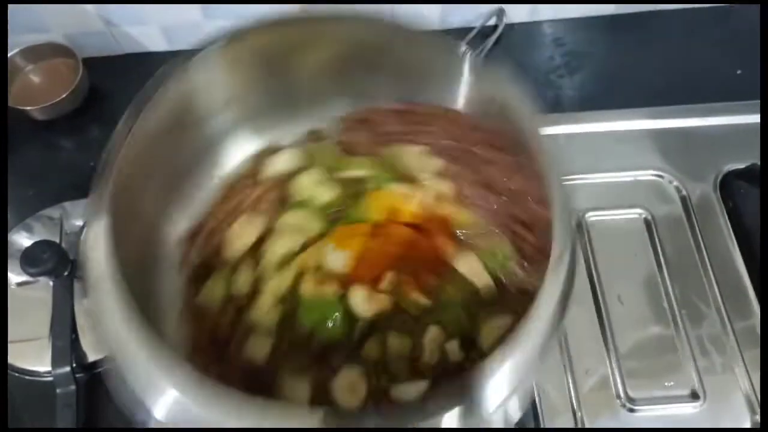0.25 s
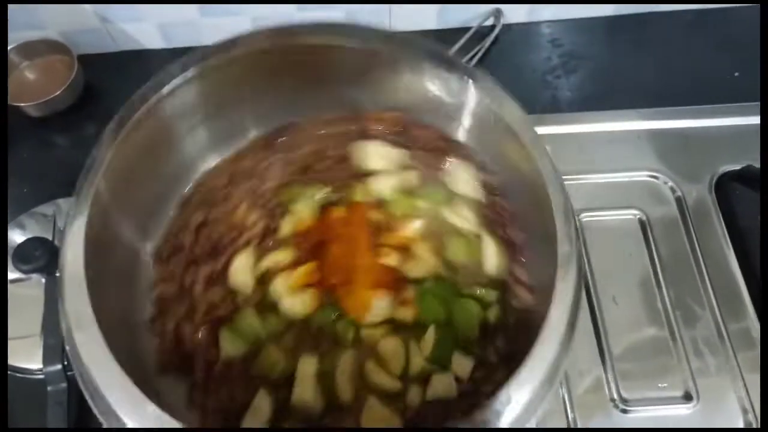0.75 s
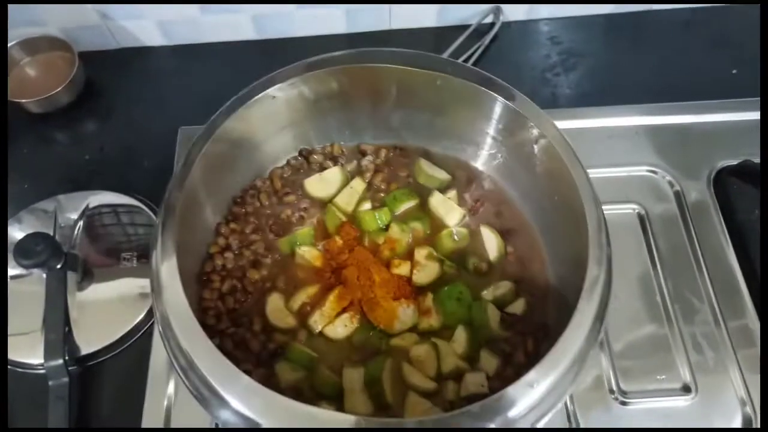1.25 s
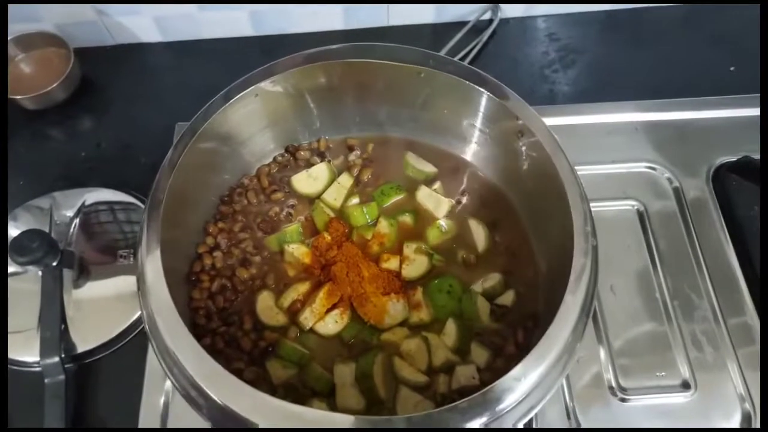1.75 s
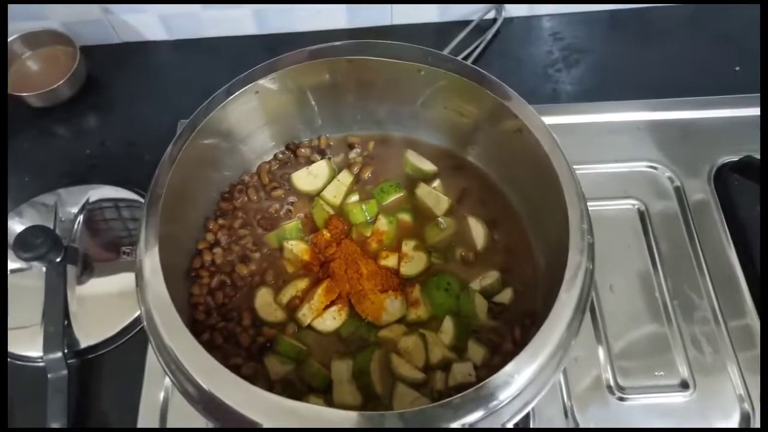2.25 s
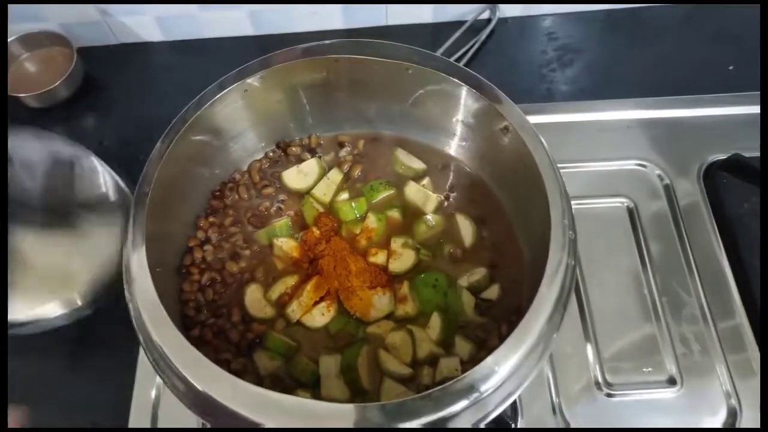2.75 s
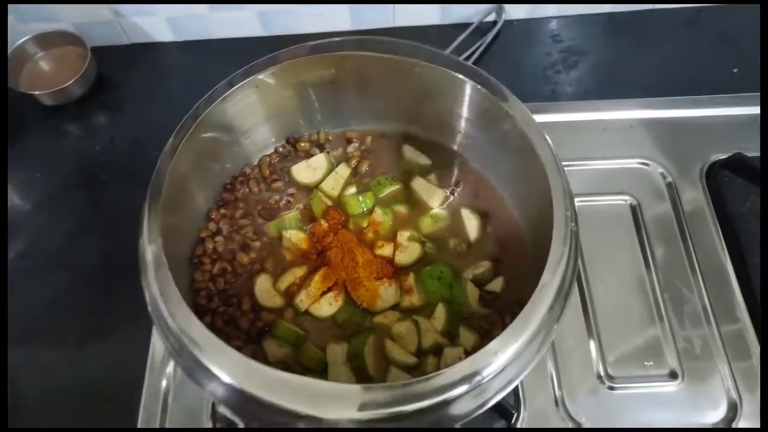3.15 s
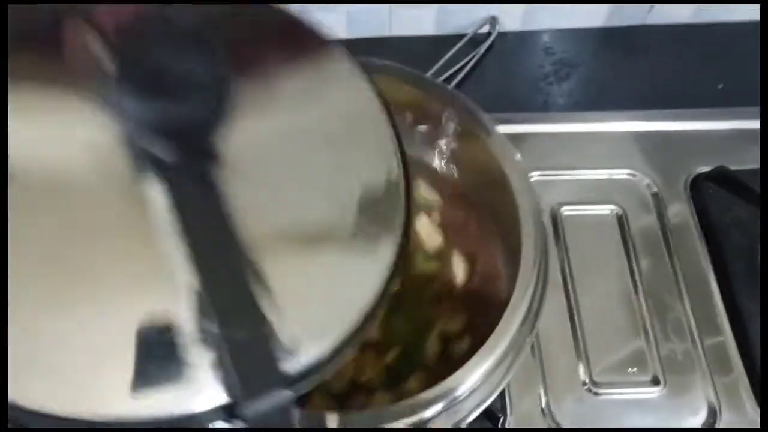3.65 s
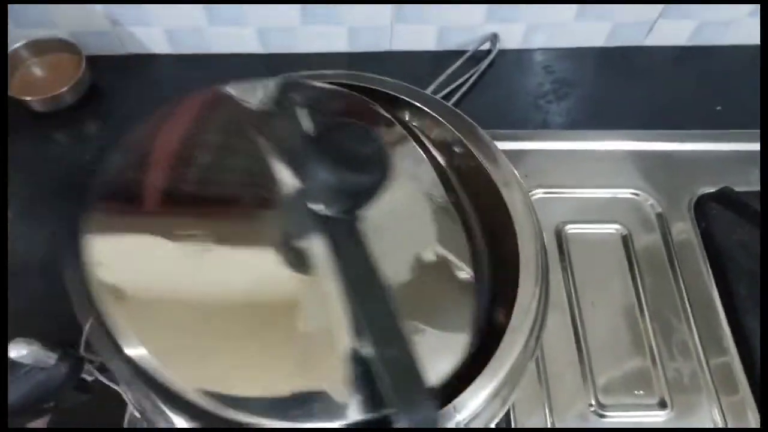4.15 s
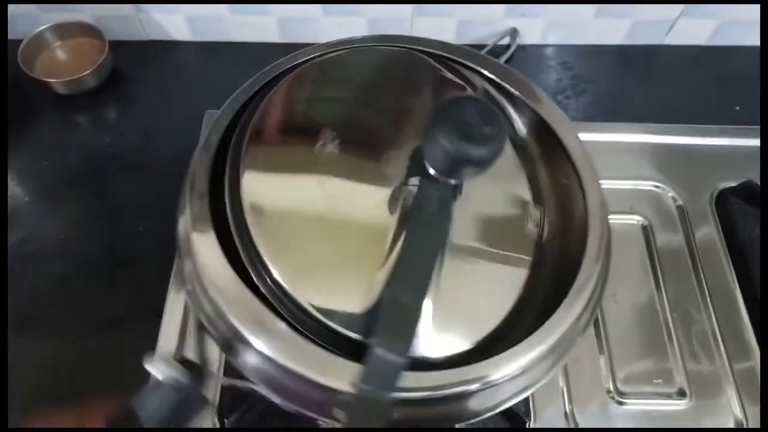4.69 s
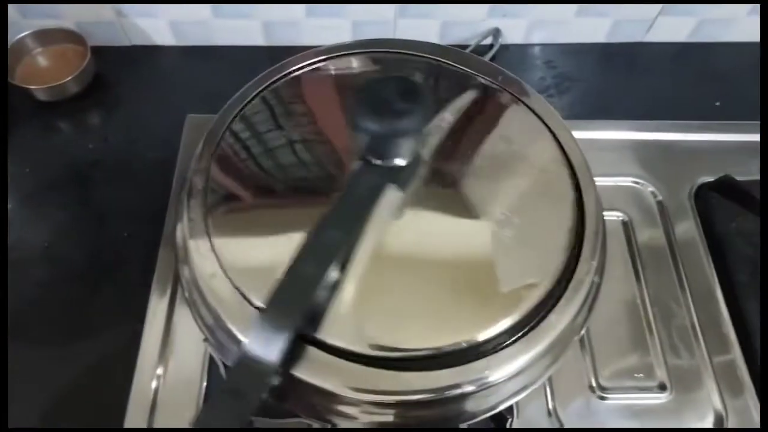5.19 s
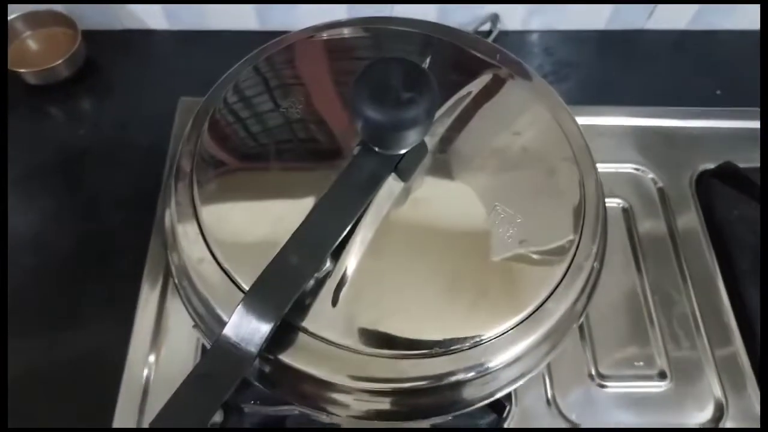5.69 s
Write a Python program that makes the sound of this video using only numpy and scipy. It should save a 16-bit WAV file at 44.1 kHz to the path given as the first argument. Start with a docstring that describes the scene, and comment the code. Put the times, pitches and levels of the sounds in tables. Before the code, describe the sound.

Close stereo microphone over a steel pressure cooker, short bright room ring. Faint sloshing beans and tiny metallic ticks come first, then a cluster of heavy pot-on-stove knocks. Near quiet follows, broken by a brief lid scrape and light rattles. Deeper knocks, a rim slide, a high pulsing squeak and bright lid clatter lead to a final hollow clank.

```python
"""Wet beans hiss in a carried steel pot, the pot knocks down on a gas stove, and its lid scrapes, bangs and squeaks.
The lid is dragged off the counter, knocked and slid into the mouth of the pot, and pulled shut.
Blows and rubbing excite noise and sine modes that die away, with a small tiled kitchen in the dense ring.
Swelling sines make the squeak, dying sines the knocks and booms, wandering tones the hums.
A pair of microphone ports close above the pot hears it in stereo, over faint kitchen air."""
import sys
import numpy as np
from scipy import signal
from scipy.fft import rfft, irfft
from scipy.io import wavfile
from scipy.ndimage import uniform_filter1d

SR = 44100
rng = np.random.default_rng(int(sys.argv[2]) if len(sys.argv) > 2 else 0)


def put_to_file(sound):
    """Save the sound as 16-bit audio at rate SR, in the file named by the first command-line argument."""
    columns = np.atleast_2d(sound).T  # one column per channel
    safe = np.clip(columns, -1, 1)
    whole_steps = np.round(safe * 32767)
    wavfile.write(sys.argv[1], SR, whole_steps.astype(np.int16))


N = 261326  # length of the scene [samples]

# Pot meeting the stove top: (time [s], middle-band level [dB], bass relative to it [dB], chatter [s])
STOVE_CONTACTS = [(1.293, -31, -2.5, 0.11), (1.419, -26, -4, 0.045), (1.489, -29.5, -3.5, 0.039),
                  (1.541, -26.5, -5, 0.04), (1.763, -54.5, 15, 0.026), (1.871, -31, -4.5, 0.083),
                  (1.932, -49.5, 4.5, 0.44), (3.493, -35.5, -6.5, 0.22), (3.557, -34.5, -11, 0.013),
                  (3.68, -28.5, -7, 0.027)]
# Colour of the beans and of the tick cracks: (frequency [Hz], relative level [dB])
BEAN_COLOUR = [(290, -28), (500, -19.5), (1170, -17), (1580, -24), (1770, -17), (2130, -19.5),
               (2800, -12.5), (4910, -8), (15500, -27.5)]
# How alike the two ports are: (frequency [Hz], likeness [0 to 1])
PORT_LIKENESS = [(60, 0.68), (250, 1), (500, 1), (1000, 0.5), (2400, 0.058), (6000, 0.0057),
                 (15000, 0.0098)]
# Many close modes of the lid on the pot, with the room: (frequency [Hz], relative level [dB])
LID_COLOUR = [(18, -58), (60, -18), (200, -2), (380, 0.5), (830, -1), (1200, 0.5), (2200, -4), (4500, -5),
              (8200, -16), (11000, -17.5), (15500, -23.5)]
# Lid held off the pot, with its bar: (frequency [Hz], width [Hz], level over dense ring before variation [dB])
BAR_MODES = [(1135, 69, 5), (1482, 105, 13.5), (1965, 86, 14), (2343, 100, 15.5), (2640, 200, 13.5),
             (2916, 56, 11), (3460, 150, 9.5), (3970, 270, 9.5), (4400, 60, 6.5), (4640, 180, 12),
             (5270, 250, 9.5), (6840, 370, 6.5)]
# Many close modes of the held lid, with the room: (frequency [Hz], relative level [dB])
BAR_COLOUR = [(18, -62), (30, -59), (187, -7), (341, -19), (399, -6.5), (874, -1.5), (4780, -2.5),
              (15500, -11)]
RIGHT_LATE_S = .00023  # delay of shared sound at the right port


def gain_of(db):
    """Turn decibels into an amplitude factor."""
    return 10 ** (np.asarray(db) / 20)


def evened(x):
    """Scale a sound to an average (RMS) strength of one."""
    return x / np.sqrt(np.mean(x ** 2) + 1e-20)


def read(points, hz):
    """Read a table between its points, along a logarithmic frequency scale."""
    f, value = np.transpose(points)
    return np.interp(np.log(hz + 1), np.log(f + 1), value)


def add(mix, s, sound):
    """Add a sound to the mix from time s, cutting off what runs past the end."""
    part = mix[:, round(s * SR):][:, :sound.shape[1]]
    part += sound[:, :part.shape[1]]


def lid_modes():
    """Rows (frequency [Hz], width [Hz], level [dB]) for the lid in the pot mouth."""
    # Mode pitches: (frequency [Hz])
    mode_hz = [388, 664, 1000, 1100, 1270, 1803, 2320, 2730, 2885, 3451, 3688, 3881, 4411, 4870, 5240, 6024]
    # Mode strengths: (level over the dense ring before variation [dB])
    mode_db = [-1, -11.5, -2.5, -8.5, 3.5, 2, -3, 5, -11, -2, 1, 3.5, 2.5, 3, -13, -4]
    width_hz = 28
    return [(hz, width_hz, db) for hz, db in zip(mode_hz, mode_db)]


def noise_pair(size, colour, modes=()):
    """Coloured noise at the two ports, partly shared; the shared part reaches the right port late."""
    hz = np.fft.rfftfreq(size, 1 / SR)
    left, other = rfft(rng.standard_normal((2, size)))
    same = np.clip(read(PORT_LIKENESS, hz), 0, 1)
    late = np.exp(-2j * np.pi * hz * RIGHT_LATE_S)
    right = same * left * late + np.sqrt(1 - same ** 2) * other
    # each contact point stirs the modes by different amounts and shifts them a little
    peaks = 0
    for f, width, db in modes:
        height = gain_of(db + 4 * np.clip(rng.standard_normal(), -2, 1))
        offset = 2 * (hz - f) / width - rng.standard_normal()
        peaks = peaks + height / (1 + offset ** 2)
    spectrum = np.array([left, right]) * gain_of(read(colour, hz)) * (1 + peaks)
    return evened(irfft(spectrum, size))


def three_bands(x):
    """Split into bass, middle and treble, with causal filters; the bands add up to the sound."""
    bass, below = (signal.sosfilt(signal.butter(2, hz, fs=SR, output="sos"), x) for hz in (500, 4000))
    return bass, below - bass, x - below


def clear_ring(size, colour, modes):
    """The modes as dying, beating sines, stirred unevenly and each slightly detuned at random."""
    t60_times_width = 10.9  # time to fall 60 dB [s] times mode width [Hz]
    twin_split = 0.03  # largest share of its pitch by which a twin lies apart
    hz, width, db = np.transpose(modes)[..., None]
    stir, detune, phase, apart, split = rng.random((len(modes), 5)).T[..., None]
    t = np.arange(size) / SR
    height = gain_of(read(colour, hz) + db - 11 * stir)
    turn = 2 * np.pi * (hz * (1 + .008 * (detune - .5)) * t + phase)
    unlikeness = 1 - np.clip(read(PORT_LIKENESS, hz), 0, 1)
    right = 2 * np.pi * (unlikeness * apart - hz * RIGHT_LATE_S)
    fading = height / np.linalg.norm(height) * gain_of(-60 * t * width / t60_times_width)
    # modes of a round lid come as twins, so their level beats
    fading = fading * (1 + 0.59 * np.cos(2 * np.pi * twin_split * hz * split * t))
    return np.array([(fading * np.sin(turn + lag)).sum(0) for lag in (0, right)])


def response(colour, modes, damping, direct_db, ring_db):
    """What one contact sets ringing: a direct crack, clear modes, and a dense ring that dies band by band."""
    # Time to fall 60 dB, before division by damping: (frequency [Hz], time [s])
    ring_out = [(100, 1.), (260, .8), (500, .8), (1000, .7), (1840, .62), (4850, .55), (12000, .4)]
    size = 36000
    hz, frame_s, z = signal.stft(noise_pair(size, colour, modes), SR, nperseg=256)
    fall_db = -60 * damping * frame_s / read(ring_out, hz)[:, None]
    tail = signal.istft(z * gain_of(fall_db), SR, nperseg=256)[1]
    t = np.arange(size) / SR
    # the directly struck steel dies sooner than the room around it
    direct = np.exp(-t / 0.0036) + 0.5 * np.exp(-t / 0.12)
    out = tail[:, :size] * (1 + gain_of(direct_db) * direct)
    add(out, 0, gain_of(ring_db) * clear_ring(size // 3, colour, modes))
    return out


def blows(table, colour, modes, damping, direct_db, ring_db, rebound, rise_s):
    """Each blow is a first contact and a chatter of random rebounds that dies away."""
    out, t = np.zeros((2, N)), np.arange(9000) / SR
    for s, db, bass_db, treble_db, chatter in table:
        sizes, chance = rng.standard_normal(len(t)), rng.random(len(t))
        chatter_s = max(chatter, .002)
        hits = np.clip(sizes, -3, 3) * (chance < 300 / SR)  # about 300 rebounds a second
        force = rebound * hits * np.exp(-(t / chatter_s) ** 2)
        force[0] = np.clip(0.025 / chatter_s, .6, 2.5)  # a clean strike chatters little
        ring = response(colour, modes, damping, direct_db, ring_db)
        sound = signal.fftconvolve(ring, force[None], axes=1)
        sound[:, :len(t)] *= 1 - np.exp(-t / rise_s)  # a heavy thing settles rather than strikes
        head = round((0.014 + chatter) * SR)  # each band is levelled over this opening
        bands = zip((bass_db, 0, treble_db), three_bands(sound))
        shaped = sum(gain_of(g) * band / np.std(band[:, :head]) for g, band in bands)
        add(out, s, gain_of(db) * shaped)
    return out


def rub(t, level_db, bass_db, treble_db, colour, modes):
    """Grit under a sliding rim: uneven clicks into the lid, whose colour shifts as the contact travels."""
    click_size = gain_of(2.9 * np.minimum(rng.exponential(1, SR), 4))
    grit = click_size * (rng.random(SR) < 2500 / SR)  # about 2500 clicks a second
    grit = (grit * rng.choice([-1., 1.], SR))[:len(t)] * signal.windows.tukey(len(t), .05)
    out = 0
    for spot in range(5):
        touch = np.cos(np.pi * (5.5 * t + spot / 5)) ** 4 / np.std(grit)
        ring = response(colour, modes, damping=0.97, direct_db=37.0, ring_db=-17.0)
        for band, colour_db in zip(three_bands(ring), (bass_db, 0, treble_db)):
            force = grit * touch * gain_of(level_db + colour_db)
            out = out + signal.fftconvolve(band, force[None], axes=1) / np.linalg.norm(band[0])
    return out


def kitchen_air():
    """A steady hush of coloured noise stands for the quiet kitchen."""
    # Colour of the hush: (frequency [Hz], relative level [dB])
    air_colour = [(15, -84), (25, -15), (75, 1), (110, -2), (160, -15.5), (260, -11.5), (297, -15),
                  (469, -25), (762, -21.5), (8350, -27), (15500, -22.5)]
    return gain_of(-72) * noise_pair(N, air_colour)


def sliding_beans():
    """Wet beans hiss in small clumps, surging with each swing of the pot until it meets the stove."""
    # Swings of the pot: (time [s], level [dB])
    swings = [(0.0, -62.5), (0.142, -62), (0.52, -60.5), (0.8, -66), (1.002, -76)]
    rise_db_per_s, settle_db_per_s = 84, 47
    t = np.arange(N) / SR
    power = 0
    for s, db in swings:
        below_db = np.maximum(rise_db_per_s * (s - t), settle_db_per_s * (t - s))
        power = power + gain_of(db - below_db) ** 2
    clumps = evened(uniform_filter1d(rng.standard_normal(N), 400))
    carried = t < STOVE_CONTACTS[0][0]
    return noise_pair(N, BEAN_COLOUR) * np.sqrt(power) * gain_of(1.4 * clumps) * carried


def hums():
    """Brief fuzzy hums of unevenly driven modes: gliding tones whose height and phase wander."""
    # Hums: (start [s], end [s], start frequency [Hz], end frequency [Hz], level before fades [dB])
    hum_rows = [(0.111, 0.333, 1234, 1190, -75), (0.873, 1.152, 2100, 2100, -82.5),
                (2.355, 2.535, 4020, 4170, -68.5), (2.369, 2.46, 1100, 1120, -71),
                (2.625, 2.68, 388, 414, -40), (2.696, 2.888, 564.4, 710, -45),
                (3.917, 4.037, 669, 653, -43), (4.697, 4.73, 1314, 1290, -35.5),
                (4.91, 4.99, 1067, 1038, -43.5), (5.491, 5.523, 217, 245, -42)]
    calm = 190  # smoothing of the wandering [samples]
    out = np.zeros((2, N))
    for start, end, hz, end_hz, db in hum_rows:
        size = round((end - start) * SR)
        wander = uniform_filter1d(rng.standard_normal((2, 2, SR // 2)), calm)
        a, b = uniform_filter1d(wander, calm)[..., :size]
        pitch = hz + (end_hz - hz) * np.sin(np.linspace(0, np.pi / 2, size))
        tone = ((a + 1j * b) * np.exp(2j * np.pi * np.cumsum(pitch) / SR)).real
        add(out, start, gain_of(db) * evened(tone) * signal.windows.tukey(size, .4))
    return out


def steel_ticks():
    """Small ticks on the steel: a cluster of near modes and a short noisy crack."""
    # Ticks: (time [s], level before modes and crack are summed [dB], centre frequency [Hz])
    ticks = [(0.1397, -56, 4750), (0.2014, -59, 4400), (0.247, -64, 1720), (0.553, -60, 5070),
             (0.904, -67, 3820)]
    cycles = 540  # cycles a tick rings before it is 60 dB down
    out, t = np.zeros((2, N)), np.arange(9000) / SR
    for s, db, hz in ticks:
        near_hz = hz * (1 + 0.06 * rng.standard_normal((5, 1)))
        ring = [np.sin(2 * np.pi * (near_hz * t + rng.random((5, 1)))).sum(0) for _ in range(2)]
        crack = 1.7 * noise_pair(len(t), BEAN_COLOUR) * np.exp(-t / 0.0046)
        add(out, s, gain_of(db - 60 * t * hz / cycles) * (np.array(ring) + crack))
    return out


def pot_on_stove():
    """The pot strikes and chatters on the stove, ringing its pan support and sheet top."""
    # Pan support and sheet top: (frequency [Hz], width [Hz], level over dense ring before variation [dB])
    stove_modes = [(236.3, 16, 1.5), (296.5, 30, 1), (358.8, 21, -5), (402, 22, -1), (653, 57, 4.5),
                   (774, 27, -4.5), (876, 41, 0.5), (1250, 29, -8), (1820, 460, -0.5)]
    # The stove's many close modes and the room: (frequency [Hz], relative level [dB])
    stove_colour = [(18, -59), (40, -9.5), (100, -17.5), (240, -12), (450, -11), (900, -6), (1550, -9),
                    (2500, -6), (3200, -12.5), (4540, -9), (8200, -24), (15500, -38)]
    treble_db = -6.5  # relative to the middle band
    rows = [(s, db, bass_db, treble_db, chatter) for s, db, bass_db, chatter in STOVE_CONTACTS]
    return blows(rows, stove_colour, stove_modes, damping=0.69, direct_db=15.5, ring_db=5.5,
                 rebound=0.26, rise_s=0.0017)


def thuds():
    """The hollow stove body booms, with a close second mode and a brief higher one."""
    # Booms: (time [s], level of the lowest mode before its rise [dB], frequency [Hz], time to fall 60 dB [s])
    booms = [(1.298, -48, 49, 0.87), (1.501, -37, 97.7, 0.77), (5.551, -29.5, 96.8, 0.79)]
    out, t = np.zeros((2, N)), np.arange(40000) / SR
    for s, db, hz, t60 in booms:
        pair = np.sin(2 * np.pi * hz * t) + 0.7 * np.sin(2 * np.pi * 1.143 * hz * t - 1.4)
        higher = 1.2 * np.sin(2 * np.pi * 1.6 * hz * t) * np.exp(-t / .06)
        rise = 1 - np.exp(-t / 0.01)
        add(out, s, (gain_of(db - 60 * t / t60) * (pair + higher) * rise)[None])
    return out


def counter_drag():
    """The lid rubs over the stone counter; its bass thins faster than its level as the drag eases."""
    # Course of the drag: (time [s], level [dB], treble relative to it [dB])
    drag_course = [(2.241, -74, 9), (2.502, -74, -9), (2.532, -66, 20), (2.55, -50, 12.5), (2.61, -42, 6.5),
                   (2.638, -31.5, 5), (2.69, -33.5, 0.5), (2.75, -37.5, -6), (2.85, -46.5, -9),
                   (2.9, -50.5, -2.5), (3.03, -57, 3.5)]
    out = np.zeros((2, N))
    s, db, treble_db = np.transpose(drag_course)
    t = np.arange(s[0], s[-1], 1 / SR)
    level_db = np.interp(t, s, db)
    bass_db = -7.5 + 2 * (level_db - db.max())  # bass relative to the level
    add(out, s[0], rub(t, level_db, bass_db, np.interp(t, s, treble_db), BAR_COLOUR, BAR_MODES))
    return out


def bar_rattle():
    """The loose locking bar knocks and rebounds, ringing the lid held off the pot."""
    # Rattles: (time [s], middle-band level [dB])
    rattles = [(2.538, -44.5), (2.7808, -47), (2.943, -52), (3.053, -49), (3.071, -54), (3.1489, -41.5),
               (3.241, -48.5), (3.257, -53), (5.86, -55)]
    bass_db, treble_db, chatter_s = -23, 5, 0.0068  # bass and treble relative to the middle band
    rows = [(s, db, bass_db, treble_db, chatter_s) for s, db in rattles]
    return blows(rows, BAR_COLOUR, BAR_MODES, damping=0.76, direct_db=11.0, ring_db=5.0,
                 rebound=0.47, rise_s=0.00017)


def knocks():
    """The hollow of the pot answers firm blows with a few dying cycles of one low tone."""
    # Knocks: (time [s], starting level [dB], frequency [Hz])
    hollow_knocks = [(3.51, -27.5, 257), (3.557, -24.5, 320), (3.628, -25.5, 294), (3.644, -28, 260),
                     (3.679, -27, 310), (4.123, -18, 686), (4.2255, -27.5, 530), (4.2565, -18, 710),
                     (4.3982, -21.5, 1010), (4.49, -19, 440), (5.135, -23, 1320), (5.2035, -20.5, 680),
                     (5.246, -20.5, 260), (5.553, -24.5, 200)]
    cycles = 12.2  # cycles a knock rings before it is 60 dB down
    out, t = np.zeros((2, N)), np.arange(4000) / SR
    for s, db, hz in hollow_knocks:
        add(out, s, (gain_of(db - 60 * t * hz / cycles) * np.sin(2 * np.pi * hz * t))[None])
    return out


def rim_slides():
    """The lid rubs along the pot rim in slides that swell and ease."""
    # Slides: (start [s], hardest [s], end [s], level at the hardest [dB], bass relative to it [dB])
    slide_rows = [(3.701, 3.796, 4.1, -38.5, -5.5), (4.748, 4.96, 5.1, -41.5, -3.5)]
    start_db, end_db, treble_db = -14, -11, -7  # ends relative to the hardest, treble to the level
    out = np.zeros((2, N))
    for start, hardest, end, db, bass_db in slide_rows:
        t = np.arange(start, end, 1 / SR)
        level_db = db + np.interp(t, (start, hardest, end), (start_db, 0, end_db))
        add(out, start, rub(t, level_db, bass_db, treble_db, LID_COLOUR, lid_modes()))
    return out


def squeak():
    """Stick-slip locks on one lid mode: swelling near-sine, with weak overtones that grow with its strength."""
    # Swells: (middle [s], length [s], level before the left-right balance [dB])
    swell_rows = [(4.03, 0.049, -39.5), (4.057, 0.059, -23), (4.109, 0.09, -19), (4.143, .03, -32),
                  (4.183, 0.056, -31.5), (4.235, 0.091, -34.5), (4.27, 0.028, -30.5), (4.33, 0.1, -48)]
    # Overtones at the strongest swell: (multiple of the pitch, level relative to the main tone [dB])
    overtones = [(2, -27), (3, -42)]
    pitch_hz = 3743
    t = np.arange(N) / SR
    swells = 0
    for s, length, db in swell_rows:
        swells = swells + gain_of(db) * np.cos(np.pi * np.clip((t - s) / length, -.5, .5)) ** 2.23
    turn = 2 * np.pi * pitch_hz * t + np.array([[.6], [0]])  # left leads in phase
    tone = np.sin(turn)
    for k, db in overtones:
        tone = tone + gain_of(db) * (swells / swells.max()) ** (k - 1) * np.sin(k * turn)
    return tone * swells * gain_of([[-2.1], [2.1]])  # right is louder


def lid_on_pot():
    """The lid knocks and chatters in the pot mouth, ringing its modes."""
    # Knocks: (time [s], middle-band level [dB], bass and treble relative to it [dB, dB], chatter [s])
    lid_contacts = [(4.123, -26, -12, -9, 0.013), (4.139, -29.5, -38, -2, 0.013),
                    (4.226, -42, -10, 3.5, 0.013), (4.259, -31, -18.5, -3, 0.016),
                    (4.398, -24.5, -20, 0, 0.014), (4.412, -28.5, -22.5, 3.5, 0.029),
                    (4.489, -29, -13, 2.5, 0.0063), (4.496, -32, -11, 5.5, 0.014),
                    (4.531, -34.5, -12, 0, 0.037), (4.678, -35.5, -13, 0.5, 0.023),
                    (4.705, -47, 5, 10.5, 0.019), (4.747, -34, -4, -4.5, 0.041), (5.126, -42.5, 2, 2, 0.02),
                    (5.135, -25.5, -11, -2, 0.015), (5.204, -28, -1, 3, 0.031),
                    (5.217, -26.5, -6.5, -0.5, 0.018), (5.246, -26, -6, 1.5, 0.025),
                    (5.259, -41, -7, -9, 0.0061), (5.329, -33.5, -7, 0, 0.048),
                    (5.541, -27.5, -5, 2, 0.066)]
    return blows(lid_contacts, LID_COLOUR, lid_modes(), damping=0.62, direct_db=20.5, ring_db=15.0,
                 rebound=0.49, rise_s=.0004)


def scene():
    """Add all the sounds together, roughly in order."""
    carried = kitchen_air() + sliding_beans() + hums() + steel_ticks()
    set_down = pot_on_stove() + thuds()
    lid_in_hand = counter_drag() + bar_rattle()
    closing = knocks() + rim_slides() + squeak() + lid_on_pot()
    return carried + set_down + lid_in_hand + closing


def record(dry):
    """The two ports differ in colour; small capsules lose deep bass, and the top is cut off."""
    # Balance of the ports: (frequency [Hz], left over right [dB])
    port_tilt = [(60, 1), (180, 0.5), (550, 1.5), (1650, -1.5), (4970, -5), (15000, 1.5)]
    hz = np.linspace(0, SR / 2, 257)
    ports = [signal.firwin2(255, hz, gain_of(side * read(port_tilt, hz)), fs=SR) for side in (.5, -.5)]
    coloured = signal.oaconvolve(dry, np.array(ports), "same", axes=1)
    coloured = signal.sosfilt(signal.butter(2, 40, "high", fs=SR, output="sos"), coloured)
    top_cut = signal.firwin(255, 16000, window=("kaiser", 9), fs=SR)
    return signal.oaconvolve(coloured, top_cut[None], "same")


dry = scene()
out = record(dry)
put_to_file(out)
```